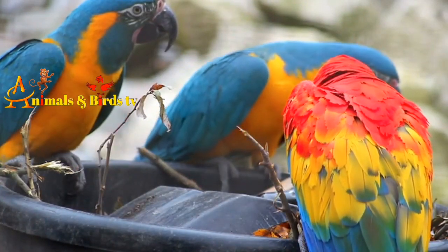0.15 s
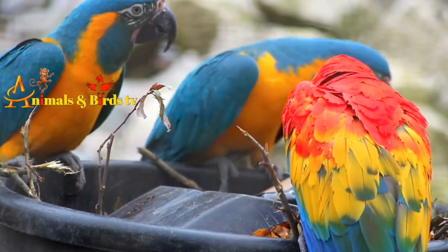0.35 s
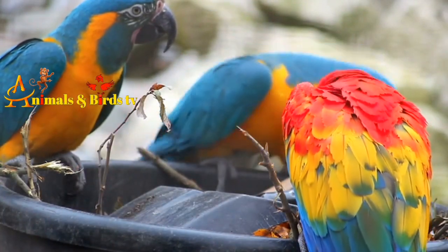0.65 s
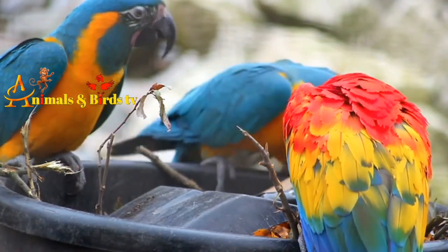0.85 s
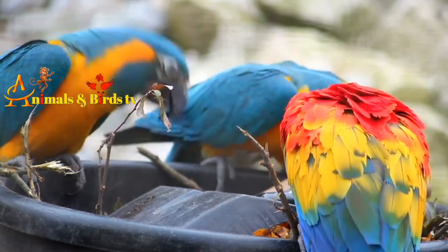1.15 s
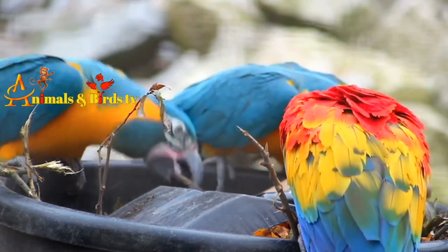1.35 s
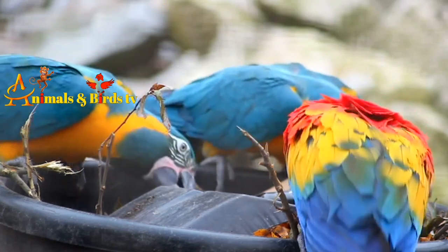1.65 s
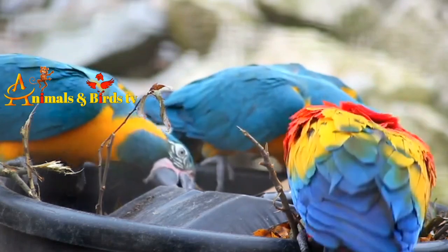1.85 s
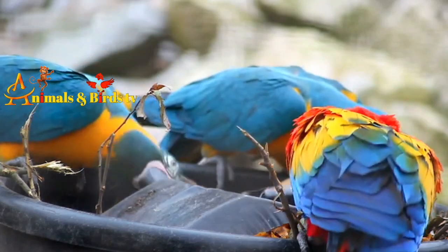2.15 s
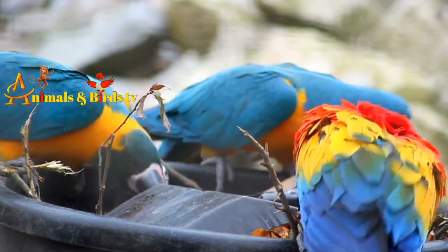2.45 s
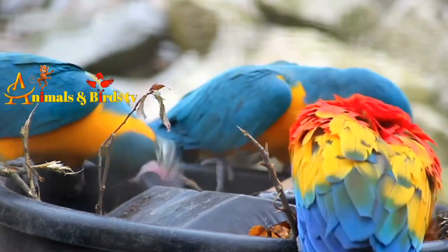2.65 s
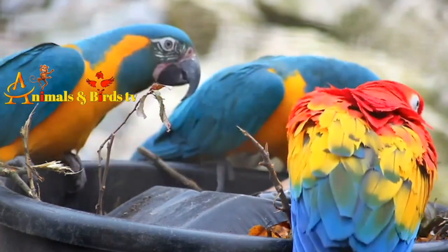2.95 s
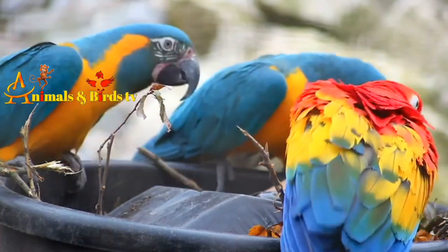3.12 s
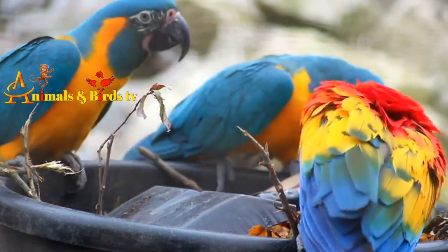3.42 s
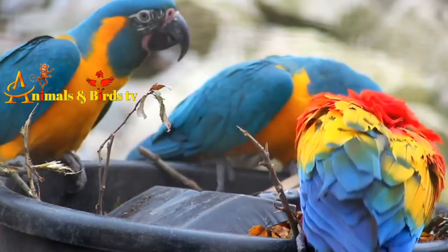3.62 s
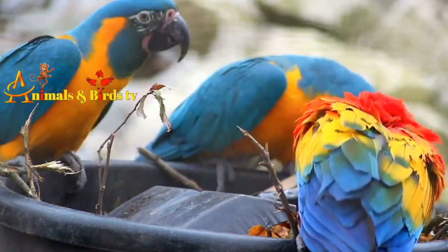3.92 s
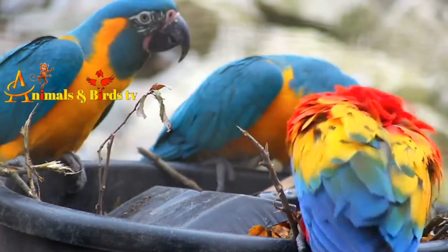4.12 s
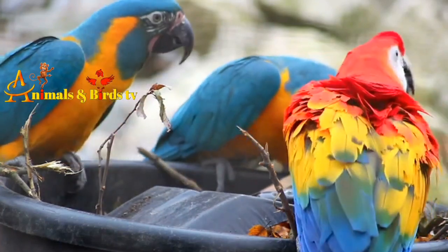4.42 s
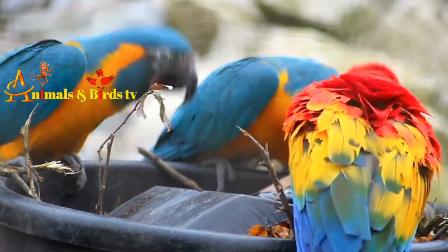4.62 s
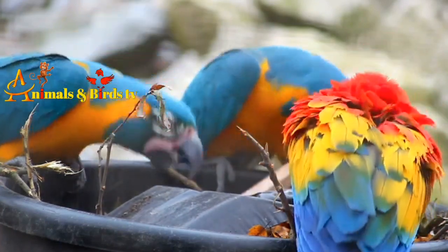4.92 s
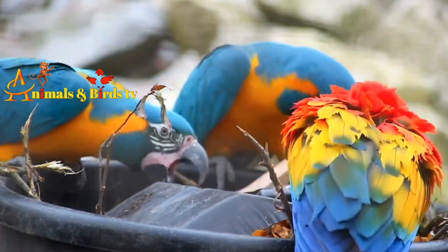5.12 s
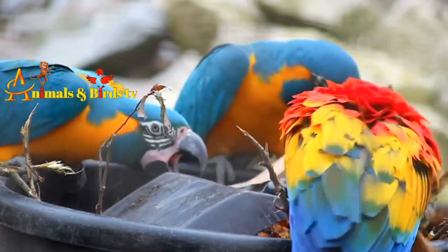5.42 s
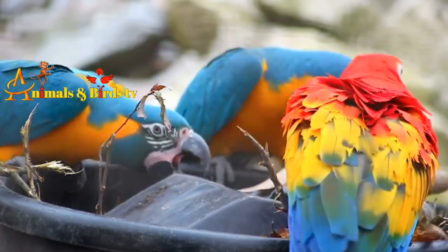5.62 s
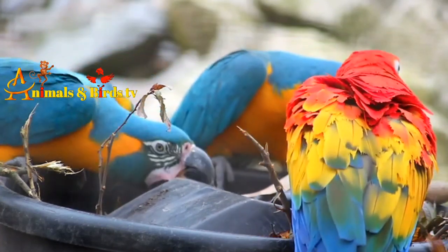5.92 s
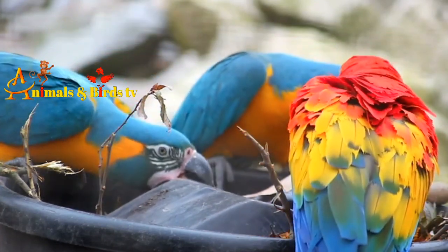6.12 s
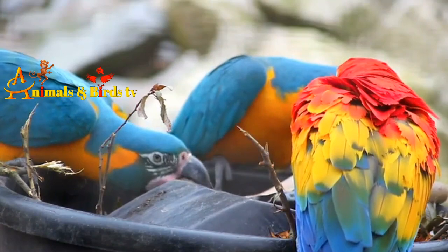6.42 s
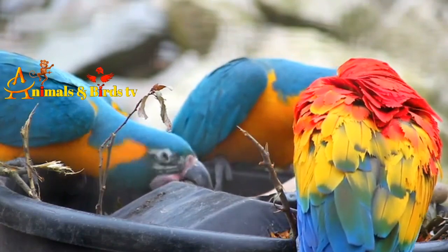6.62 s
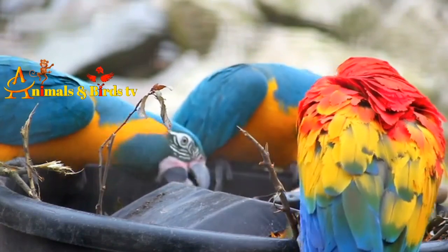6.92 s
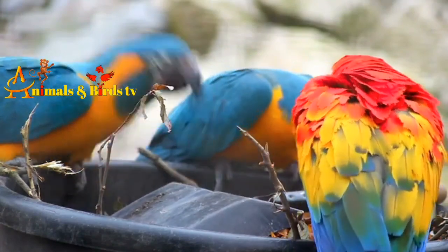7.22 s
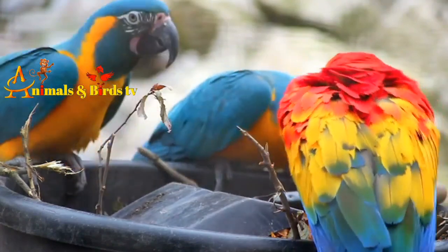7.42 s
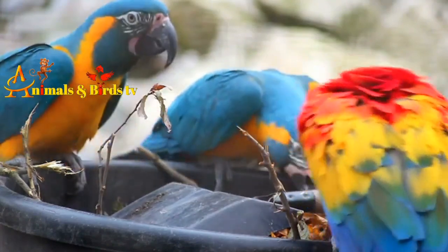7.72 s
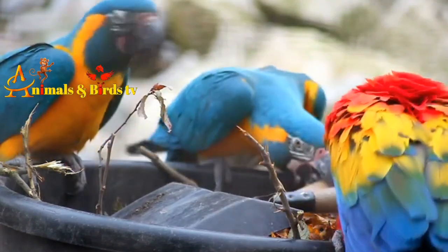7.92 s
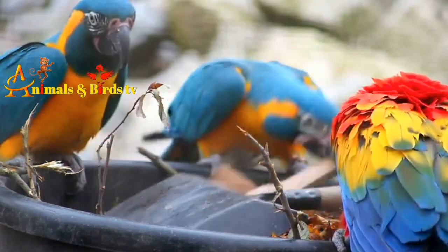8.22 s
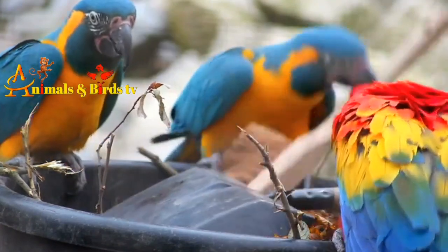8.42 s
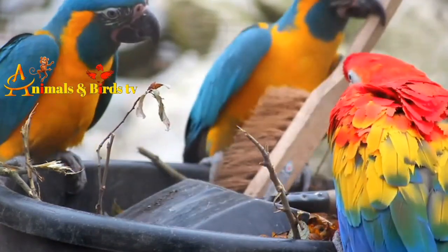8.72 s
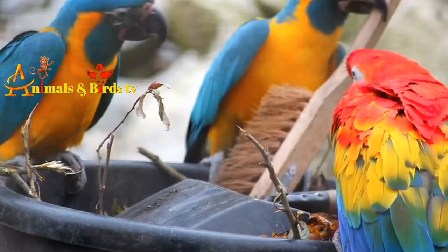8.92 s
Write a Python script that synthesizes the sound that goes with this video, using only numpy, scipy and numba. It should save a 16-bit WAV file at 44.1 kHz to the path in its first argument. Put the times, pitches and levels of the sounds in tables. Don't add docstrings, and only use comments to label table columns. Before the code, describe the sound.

A brief sliding whistle and grunt open over a low outdoor rumble. Parrots give short nasal quacks while beaks and claws tap a hollow plastic tub. Squawks build into harsh, piercing outbursts around three to four seconds, then softer isolated squawks follow. After a quiet gap, quacks and chirps return. Fairly close microphone, hard-walled aviary with a short diffuse echo.

```python
import sys
import numpy as np
from scipy import signal
from scipy.fft import rfft, irfft
from scipy.io import wavfile
from scipy.ndimage import uniform_filter1d
from numba import njit

SR = 44100
rng = np.random.default_rng(int(sys.argv[2]) if len(sys.argv) > 2 else 0)


def gain_from_db(level_db):
    decades = np.asarray(level_db, float) / 20
    return 10 ** decades


def wav_record(signal):
    frames = np.transpose(np.atleast_2d(signal))
    bounded = np.clip(frames, -1, 1)
    quanta = np.round(bounded * 32767).astype(np.int16)
    wavfile.write(sys.argv[1], SR, quanta)


N = 399546
TIME = np.arange(N) / SR
TOP_HZ = 10800


def level(x):
    return x / np.sqrt(np.mean(x ** 2))


@njit
def svf(x, hz, width):
    y, band, low = np.empty(len(x)), 0., 0.
    for i in range(len(x)):
        g, k = np.tan(np.pi * hz[i] / SR), width / hz[i]
        v = (band + g * (x[i] - low)) / (1 + g * (g + k))
        band, low, y[i] = 2 * v - band, low + 2 * g * v, k * v
    return y


def ring(x, hz, width_hz):
    hz = hz + np.zeros(len(x))
    once = svf(x, hz, 1. * width_hz)
    return svf(once, hz, 1. * width_hz)


def walk(rate):
    hold = int(SR / rate)
    steps = np.repeat(rng.standard_normal(N // hold + 1), hold)
    return level(uniform_filter1d(steps, hold)[:N])


def play(notes, edge_s):
    s, *columns = np.transpose(np.concatenate(sorted(notes, key=lambda n: n[0][0])))
    gate = np.zeros(N)
    for n in notes:
        inside_s = np.minimum(TIME - n[0][0], n[-1][0] - TIME)
        gate += np.clip(inside_s / edge_s + .5, 0, 1)
    return gate, [np.interp(TIME, s, c) for c in columns]


def air():
    # (frequency [Hz], density [dB per Hz])
    spectrum = [(26, -88), (45, -40), (62, -25), (107, -10.5), (135, -3), (280, -5), (369, -10), (443, -12),
                (860, -10), (1330, -16), (1750, -18.5), (4670, -37), (10600, -40.5), (13800, -70),
                (22000, -120)]
    corner_hz, corner_db = np.transpose(spectrum)
    f = np.fft.rfftfreq(N, 1 / SR) + 1
    noise = rfft(rng.standard_normal(N)) * gain_from_db(np.interp(np.log(f), np.log(corner_hz), corner_db))
    rumble, swell = np.zeros(N), walk(0.7)
    for hz in 25 * 2 ** np.arange(0, 9, .5):
        share = np.clip(1 - 2 * np.abs(np.log2(f / hz)), 0, 1)
        rumble += gain_from_db(.5 * swell + 0.38 * walk(3.2)) * irfft(noise * share, N)
    hum = level(ring(rng.standard_normal(N), 358, 11)) * gain_from_db(3.5 * walk(4.2))
    return gain_from_db(-42.5) * (level(rumble) + gain_from_db(-14.0) * hum)


def tune(calls, shape):
    peak, glide, start_db, end_db, octave_db, third_db = shape
    brighten, usual_db = 0.17, -30.5
    notes = []
    for s, length, db, start_hz, end_hz in calls:
        times = s + length * np.array([0, np.clip(peak, .05, .95), 1])
        hz = start_hz + (end_hz - start_hz) * np.array([0, glide, 1])
        effort = db + np.array([start_db, 0, end_db])
        third = effort + third_db + brighten * (effort - usual_db)
        notes.append(np.transpose([times, hz, third, effort, effort + octave_db]))
    return notes


def whistle(notes):
    overtones_db = [-10, -8]
    gate, (hz, third_db, db, octave_db) = play(notes, .005)
    turn = 2 * np.pi * np.cumsum(hz * (1 + 0.011 * walk(300))) / SR
    upper = np.sin(3 * turn)
    for k, overtone_db in zip((4, 5), overtones_db):
        upper = upper + gain_from_db(overtone_db) * np.sin(k * turn) * (k * hz < TOP_HZ)
    tone = gain_from_db(db) * np.sin(turn)
    tone += gain_from_db(octave_db + 1.66 * walk(70)) * np.sin(2 * turn)
    tone += gain_from_db(third_db + 4.5 + 3.63 * walk(70)) * upper
    return np.sqrt(2) * gate * gain_from_db(2.4 * walk(90)) * tone


def lead_whistles():
    # (time [s], length [s], peak level [dB], start pitch [Hz], end pitch [Hz])
    slides = [
        (0, .035, -25, 2202, 2150),
        (2.975, .045, -19, 2750, 2200),
        (4.892, .028, -41, 2356, 2221),
        (5.667, .021, -39, 2328, 2380),
        (6.352, .02, -37.5, 2410, 2339),
    ]
    # (time [s], length [s], peak level [dB], start pitch [Hz], end pitch [Hz])
    sweeps = [
        (2.665, .085, -20.5, 1760, 1224),
    ]
    # (time [s], length [s], peak level [dB], start pitch [Hz], end pitch [Hz])
    sags = [
        (2.2, .13, -28, 1716, 1300),
    ]
    # (time [s], length [s], peak level [dB], start pitch [Hz], end pitch [Hz])
    lead_ins = [
        (2.895, .08, -19, 2886, 3070),
        (3.19, 0.065, -30.5, 2730, 2900),
        (3.5, .033, -29.5, 2366, 2370),
        (4.865, 0.031, -50, 3011, 3000),
        (5.635, .028, -45, 2980, 3007),
        (6.325, .023, -46, 2990, 2980),
        (9.012, 0.0505, -28.5, 2939, 3040),
    ]
    # (time [s], length [s], peak level [dB], start pitch [Hz], end pitch [Hz])
    shrieks = [
        (3.25, .05, -15, 2047, 2236),
        (3.568, 0.039, -17.5, 2010, 2114),
        (3.89, 0.045, -19.5, 1986, 2150),
    ]
    # (time [s], length [s], peak level [dB], start pitch [Hz], end pitch [Hz])
    chirps = [
        (3.42, 0.0225, -22, 2249, 2245),
        (8.14, 0.0304, -36.5, 2402, 2200),
        (8.28, 0.0407, -31.5, 2160, 2080),
        (8.403, .032, -23, 2252, 2116),
        (8.655, .032, -28, 2110, 2269),
        (8.69, .035, -26.5, 2347, 2384),
        (8.82, .03, -28.5, 2066, 2115),
    ]
    # (peak at [share of length], glide done by then [share],
    # start level [dB], end level [dB], octave level [dB], third partial level [dB])
    slide_shape = (0.7, 0.31, -2, -2.5, -8, -22)
    sweep_shape = (.28, .1, -12, -8, -8, -27)
    sag_shape = (0.4, 0.87, -13, -8, -14, -24)
    lead_in_shape = (0.64, 1.07, -10.5, 1, -22.5, -24.5)
    shriek_shape = (.5, 1, -11, 0.5, -5.5, -27)
    chirp_shape = (.5, .55, -8, -5, -24, -38)
    notes = tune(lead_ins, lead_in_shape) + tune(shrieks, shriek_shape) + tune(slides, slide_shape)
    notes += tune(sweeps, sweep_shape) + tune(sags, sag_shape) + tune(chirps, chirp_shape)
    return whistle(notes)


@njit
def flap(hz, ragged, chance, drift, slip, scatter):
    pulses, phase, p, k = np.zeros(len(hz) + 200), np.empty(len(hz)), 0., 0
    for i in range(len(hz)):
        step = hz[i] * np.exp(drift * ragged[i] ** 2 * chance[k, 0]) / SR
        p += step
        if p >= 1:
            p, k = p - 1, k + 1
            late = max(-.4, min(.4, slip * ragged[i] * chance[k, 1]))
            at = i + 40 - p / step + late / step
            size, j = np.exp(scatter * ragged[i] * chance[k, 2]), max(int(at), 0)
            pulses[j] += size * (1 - (at - j))
            pulses[j + 1] += size * (at - j)
        phase[i] = p
    return pulses[:len(hz)], phase


def voice(hz, ragged, rasp_db):
    chance = rng.standard_normal((N // 20, 3))
    pulses, phase = flap(hz, ragged, chance, .13, .1, .45)
    rasp = np.exp(-phase / 0.067) * np.diff(rng.standard_normal(N + 1))
    return level(pulses * np.sqrt(700 / hz)) + gain_from_db(rasp_db) * ragged * level(rasp)


def breath(calls, bird, lungs, ragged):
    throat_hz, follow, beak_db, chest_db, second_db = bird
    attack_s, attack_db, sag_db, release, release_db = lungs
    beak = beak_db + np.array([-4, 0, 0, 0])
    chest = chest_db + np.array([-17, 0, -6.5, -6.5])
    notes = []
    for s, length, db, start_hz, end_hz in calls:
        u = np.array([0, min(attack_s / length, .4), 1 - np.clip(release, .05, .5), 1])
        hz = start_hz + (end_hz - start_hz) * u
        effort = db + np.array([attack_db, 0, sag_db, release_db])
        throat = throat_hz * (hz / 800) ** follow
        notes.append(np.transpose([s + length * u, effort, beak, chest, second_db + 0 * u,
                                   throat, hz, ragged + 0 * u]))
    return notes


def squawks():
    # (time [s], length [s], level [dB], start membrane rate [Hz], end membrane rate [Hz])
    third_bird = [
        (.012, .045, -30.5, 537, 530),
        (1.748, .21, -23.5, 821, 570),
        (2.365, .185, -27.5, 1078, 861),
        (4.558, .165, -28.5, 999.6, 900.6),
        (8.43, .08, -30, 856, 937),
        (8.83, .08, -30, 776, 636),
    ]
    # (time [s], length [s], level [dB], start membrane rate [Hz], end membrane rate [Hz])
    hoarse = [
        (2.235, 0.11, -28, 774.5, 624),
        (2.64, .12, -25, 854.5, 628),
        (4.91, 0.21, -30, 802, 697.6),
        (5.68, .19, -32.5, 780, 685),
        (6.365, 0.21, -32, 750, 660),
    ]
    # (time [s], length [s], level [dB], start membrane rate [Hz], end membrane rate [Hz])
    shrill = [
        (2.995, .11, -17.5, 779.6, 647.2),
        (5.195, .195, -24.5, 926, 643),
        (5.97, .22, -27.5, 913, 599),
    ]
    # (time [s], length [s], level [dB], start membrane rate [Hz], end membrane rate [Hz])
    harsh = [
        (3.28, 0.18, -17, 789.7, 574),
        (3.601, .2, -16.5, 725, 612),
        (3.927, .225, -18.5, 734.7, 583),
        (4.16, 0.18, -27, 826, 675),
    ]
    # (throat at 800 Hz pitch [Hz], throat follows pitch [exponent],
    # beak level [dB], chest level [dB], second partial level [dB])
    third_voice = (1948, 0.22, -6.5, -18, -8)
    hoarse_voice = (1858, 0.33, -8, -20.5, -13.5)
    shrill_voice = (2405, 0.93, -5.5, -24, -3.5)
    harsh_voice = (2184, 0.84, -6, -13.5, -11)
    # (attack [s], attack level [dB], sag over the hold [dB],
    # release [share of length], release level [dB])
    third_breath = (.03, -11, -.7, .18, -14)
    hoarse_breath = (.045, -3.5, 0.7, 0.44, -7.5)
    shrill_breath = (.025, -1.5, -1.5, 0.6, -8.5)
    harsh_breath = (-0.4, 3, -0.5, 0.5, -16)
    calls = breath(harsh, harsh_voice, harsh_breath, .56)
    calls += breath(shrill, shrill_voice, shrill_breath, .68)
    calls += breath(hoarse, hoarse_voice, hoarse_breath, .34)
    calls += breath(third_bird, third_voice, third_breath, .58)
    gate, (db, beak_db, chest_db, second_db, throat_hz, hz, ragged) = play(calls, .016)

    hz = hz * (1 + .03 * walk(45))
    source = voice(hz, ragged * np.exp(.3 * walk(45)), -5)
    source = source / np.sqrt(uniform_filter1d(ring(source, 2500, 3000) ** 2, size=600))

    patchy_db = 2.5
    throat = gain_from_db(patchy_db * walk(60)) * level(ring(source, throat_hz * (1 + 0.059 * walk(50)), 1000))
    throat += gain_from_db(-14.0) * level(ring(source, 2340, 1560))
    throat += gain_from_db(second_db + patchy_db * walk(60)) * level(ring(source, 2 * hz, 270))
    throat += gain_from_db(-6 + patchy_db * walk(60)) * level(ring(source, 3 * hz, 960))
    chest = gain_from_db(chest_db + 7.0 + patchy_db * walk(40)) * level(ring(source, hz, 260))
    beak_hz = 4010 * (throat_hz / 2100) ** .15 * (1 + .025 * walk(40))
    beak = gain_from_db(patchy_db * walk(60)) * level(ring(source, beak_hz, 850))
    top = gain_from_db(-28.5) * level(ring(source, 6110, 1200)) + gain_from_db(-14.0) * level(ring(source, 7400, 10100))
    top = gain_from_db(patchy_db * walk(60)) * top
    body = throat + chest + gain_from_db(beak_db + 5.0) * (beak - top)
    return gate * gain_from_db(db - 5 + 1.25 * walk(170)) * body


def taps():
    # (time [s], tick level [dB], thud level [dB])
    contacts = [
        (0.2297, -43, -50),
        (0.243, -44, -41),
        (0.2677, -46, -52),
        (0.3775, -43.5, -30),
        (0.6884, -37, -31.5),
        (1.0921, -38, -39),
        (1.5667, -51, -41),
    ]
    out, t = np.zeros(N), TIME[:3000]
    for s, tick_db, thud_db in contacts:
        scrape = ring(rng.standard_normal(len(t)), 2700, 4400)
        tick = gain_from_db(tick_db + 12.5) * scrape * np.exp(-t / 0.0041)
        thud = gain_from_db(thud_db) * np.sin(2 * np.pi * 450 * t) * np.exp(-t / 0.0099)
        out[int(s * SR):][:len(t)] += tick + thud
    return out


def quacks():
    # (time [s], peak level [dB], fifth partial [Hz], beak opening [dB], length [s])
    near = [(0.457, -13.5, 2417, -8.5, 0.051), (0.617, -13, 2535, -9, 0.065),
            (0.6844, -20, 2530, -37, 0.038), (0.77, -12, 2494, -10.5, 0.047),
            (0.873, -19.5, 2566, -17, 0.055), (0.92, -9.5, 2492, -11, 0.047),
            (1.023, -17, 2420, -23, 0.028), (1.169, -19, 2475, -36, 0.032),
            (1.314, -21, 2500, -20.5, 0.047), (7.709, -24, 2575, -21, 0.052), (7.89, -32, 2634, -17, 0.048)]
    # (time [s], peak level [dB], fifth partial [Hz], beak opening [dB], length [s])
    far = [
        (0.8308, -37, 2470, -2, 0.1),
        (1.0901, -30, 2440, -29, 0.062),
        (1.2408, -28.5, 2460, -15.5, 0.074),
        (1.3866, -31, 2450, -7, 0.077),
        (7.83, -41.5, 2500, -7, 0.065),
        (7.981, -35.5, 2310, -14, 0.051),
    ]
    # (time [s], peak level [dB], fifth partial [Hz], beak opening [dB], length [s])
    late = [
        (2.0739, -12.5, 2576, -8.5, 0.048),
        (2.2416, -9, 2793, -15, 0.041),
        (2.3833, -7, 2742, -14.5, 0.033),
        (2.5113, -15.5, 2771, -9, 0.054),
        (2.6407, -14, 2597, -6.5, 0.023),
        (2.7648, -11, 2814, -8, 0.027),
        (2.912, -9, 2786, -13.5, 0.03),
        (8.0664, -20, 2616, -19.5, 0.038),
        (8.6024, -5, 2758, -12, 0.038),
        (8.7426, -13, 2688, -5.5, 0.053),
    ]
    # (centre [Hz], width [Hz], level [dB])
    resonances = [
        (2200, 1020, -1.5),
        (3314, 1140, -1),
        (4396, 590, -10),
        (7230, 6600, -18),
        (1640, 1900, -8.5),
    ]
    hz, size, mouth, beak = np.full(N, 520.), np.zeros(N), np.ones(N), np.ones(N)
    birds = ((near, 11.5), (late, 5.5), (far, 1))
    calls = sorted(tuple(row) + (mouth_db,) for rows, mouth_db in birds for row in rows)
    for s, db, fifth_hz, open_db, length, mouth_db in calls:
        u = (TIME - s) / length
        on = (u > 0) & (u < 1)
        hz[on] = fifth_hz / 5 * (1 + 0.0483 * (.5 - u[on]))
        size[on] = gain_from_db(db - 19.0) * np.sin(np.pi * u[on]) ** .8
        mouth[on], beak[on] = gain_from_db(open_db + mouth_db), gain_from_db(open_db + 16.0)
    source = voice(hz, .2 * np.exp(.2 * walk(60)), 8)
    bands = [(-1) ** k * gain_from_db(d) * level(ring(source, f, w)) for k, (f, w, d) in enumerate(resonances)]
    body = bands[0] + mouth * bands[1] + bands[4] + beak * (bands[2] + bands[3])
    return size * gain_from_db(1.2 * walk(80)) * body


def further_whistles():
    # (time [s], length [s], peak level [dB], start pitch [Hz], end pitch [Hz])
    answers = [
        (2.955, .115, -26, 1694, 1416),
        (3.535, 0.0645, -29.5, 1601, 1678),
    ]
    # (time [s], length [s], peak level [dB], start pitch [Hz], end pitch [Hz])
    dips = [
        (5.145, .057, -36.5, 3200, 2758),
        (5.925, .047, -38, 3200, 2897),
    ]
    # (time [s], length [s], peak level [dB], start pitch [Hz], end pitch [Hz])
    peeps = [
        (8.172, 0.0736, -40, 3049, 3109),
    ]
    # (time [s], length [s], peak level [dB], start pitch [Hz], end pitch [Hz])
    murmurs = [
        (8.322, .108, -32.5, 1607, 1670),
        (8.722, 0.16, -35, 1625, 1623),
    ]
    # (peak at [share of length], glide done by then [share],
    # start level [dB], end level [dB], octave level [dB], third partial level [dB])
    answer_shape = (1.5, 0.96, -6.5, -5.5, 0, -11.5)
    dip_shape = (0.5, 0.5, -13, -1.5, -6.5, -27)
    peep_shape = (.4, .8, -6, -6, -13, -34)
    murmur_shape = (.2, .25, -4, -1.5, -11, -20)
    notes = tune(answers, answer_shape) + tune(murmurs, murmur_shape)
    notes += tune(peeps, peep_shape) + tune(dips, dip_shape)
    return whistle(notes)


def walls(x):
    low_t60_s, treble_t60_s, build_s = 0.45, 0.63, 0.0022
    t, noise = TIME[:SR], rng.standard_normal(SR)
    low = signal.sosfilt(signal.butter(2, 3500, fs=SR, output="sos"), noise)
    tail = low * gain_from_db(-60 * t / low_t60_s) + (noise - low) * gain_from_db(-60 * t / treble_t60_s)
    tail *= np.clip(t / build_s, 0, 1)
    return signal.fftconvolve(x, tail / np.sqrt(np.sum(tail ** 2)))[:N]


def scene():
    birds = lead_whistles() + squawks() + taps() + quacks() + further_whistles()
    return (birds + gain_from_db(-7.5) * walls(birds) + air())[None]


def top_cut(x):
    return signal.sosfilt(signal.butter(12, 10800, fs=SR, output="sos"), x)


def record(dry):
    soft = 1.5 * np.tanh(dry / 1.5)
    cut = signal.sosfilt(signal.ellip(10, .3, 60, TOP_HZ, fs=SR, output="sos"), soft)
    mix = signal.sosfilt(signal.butter(2, 60, "high", fs=SR, output="sos"), cut)
    return top_cut(mix)


dry = scene()
out = record(dry)
wav_record(out)
```